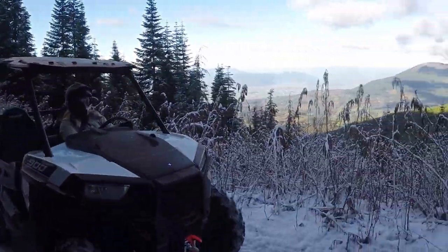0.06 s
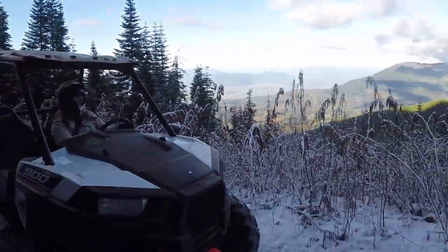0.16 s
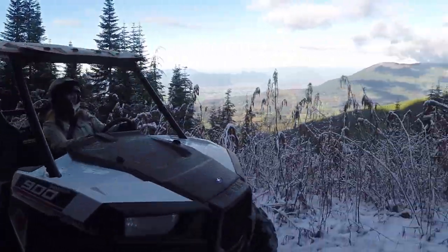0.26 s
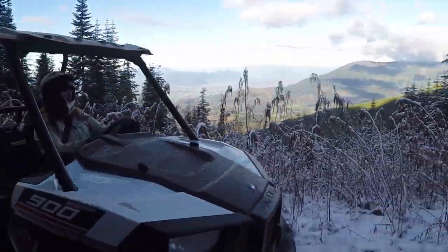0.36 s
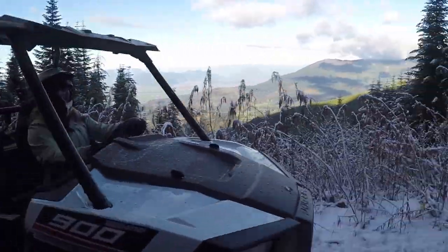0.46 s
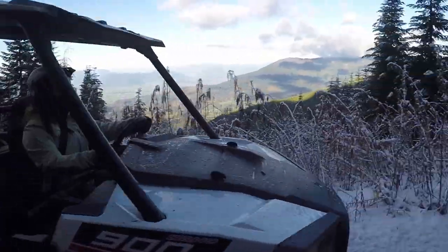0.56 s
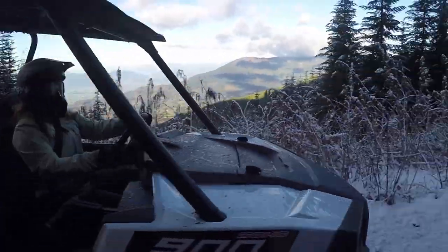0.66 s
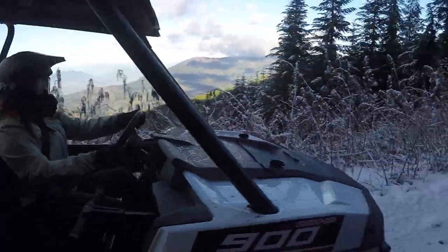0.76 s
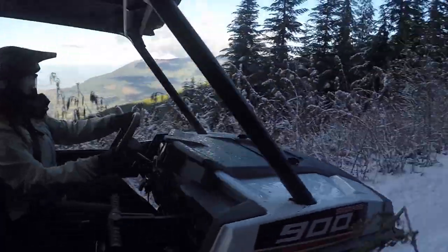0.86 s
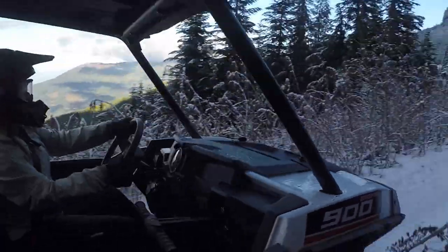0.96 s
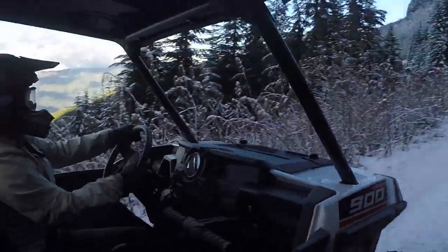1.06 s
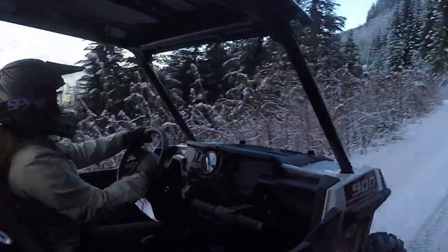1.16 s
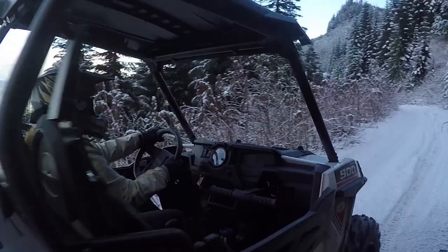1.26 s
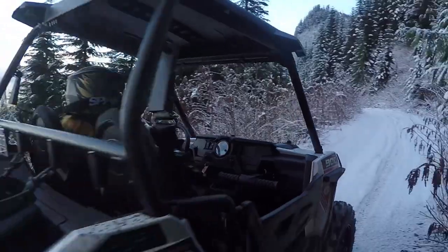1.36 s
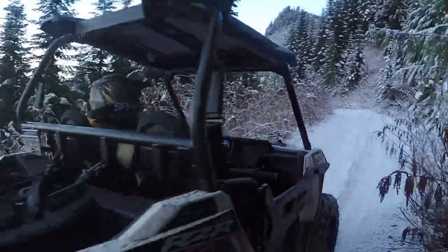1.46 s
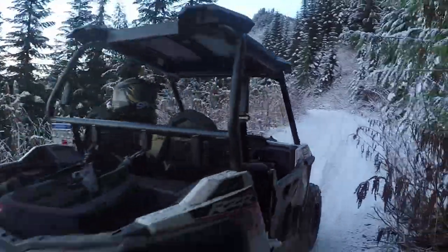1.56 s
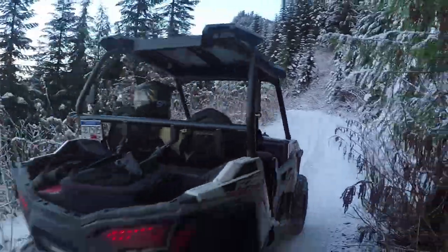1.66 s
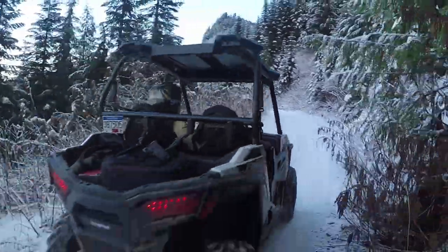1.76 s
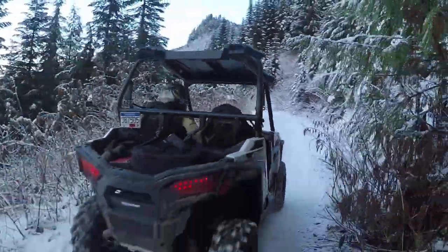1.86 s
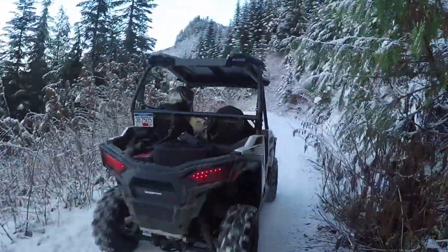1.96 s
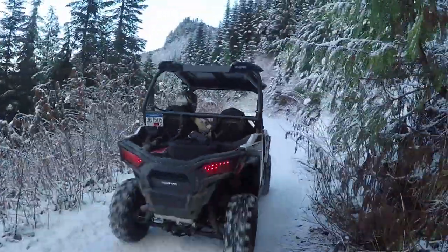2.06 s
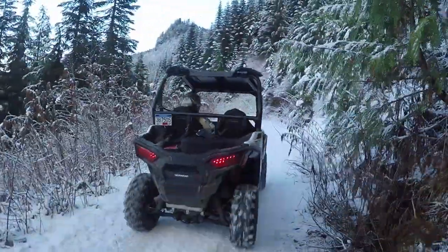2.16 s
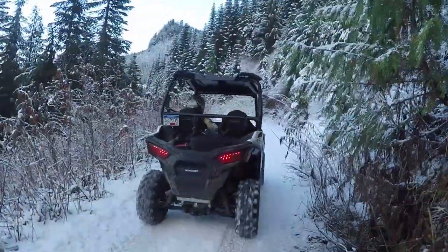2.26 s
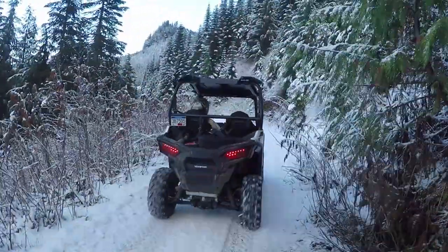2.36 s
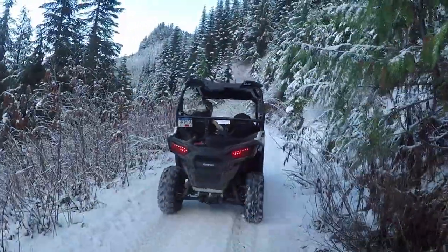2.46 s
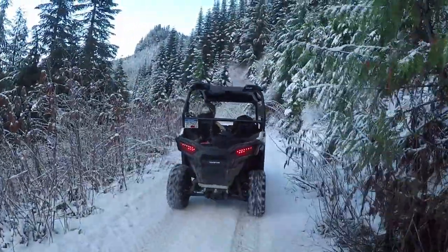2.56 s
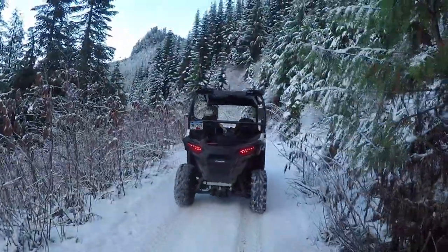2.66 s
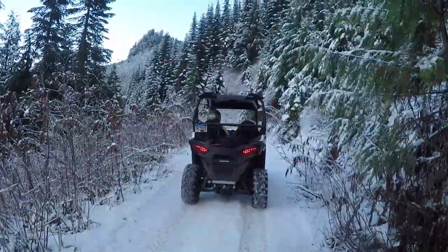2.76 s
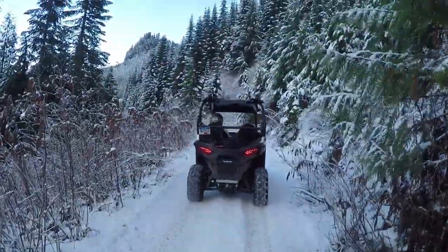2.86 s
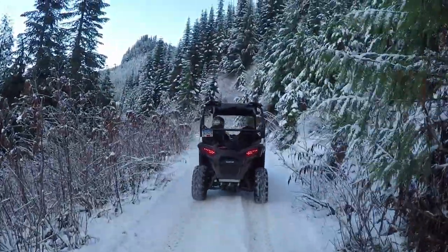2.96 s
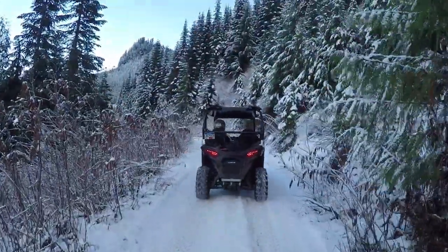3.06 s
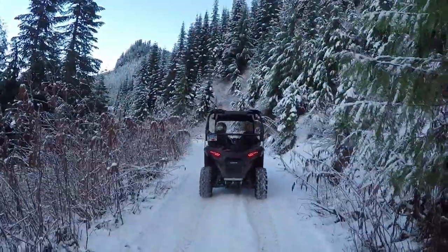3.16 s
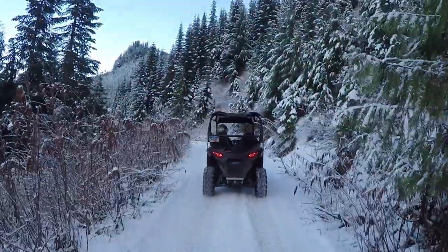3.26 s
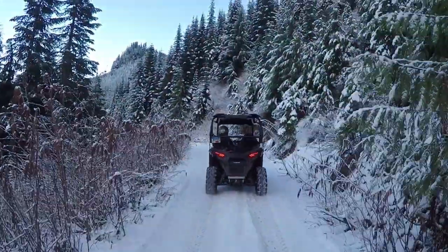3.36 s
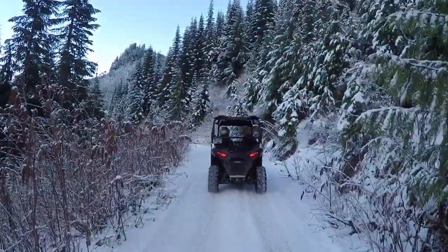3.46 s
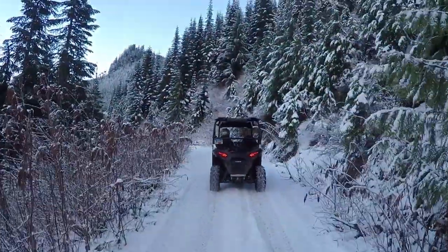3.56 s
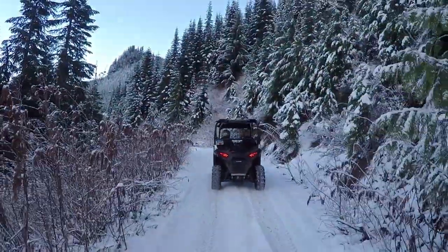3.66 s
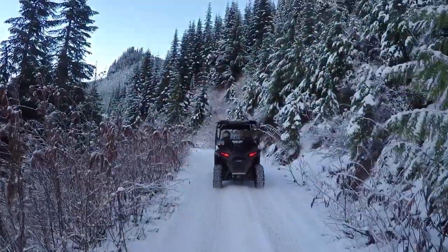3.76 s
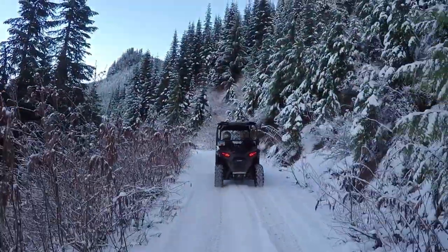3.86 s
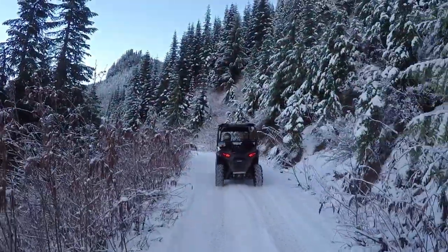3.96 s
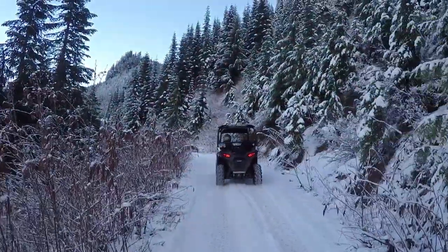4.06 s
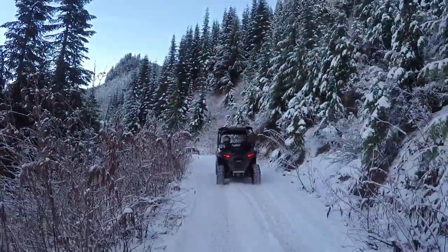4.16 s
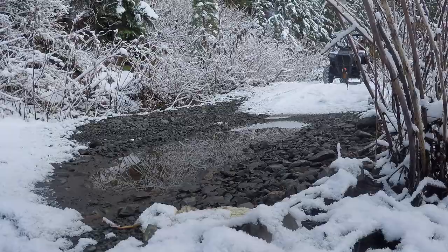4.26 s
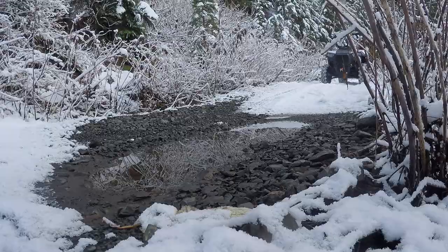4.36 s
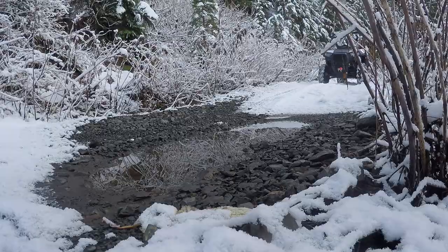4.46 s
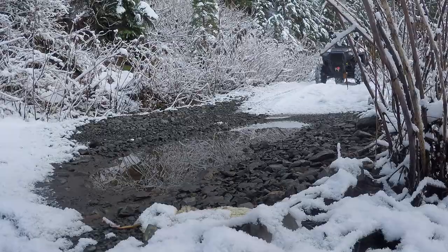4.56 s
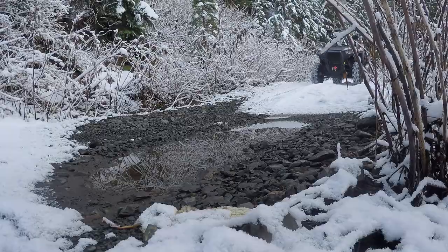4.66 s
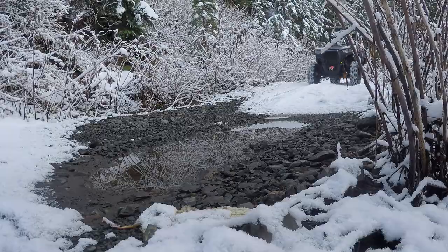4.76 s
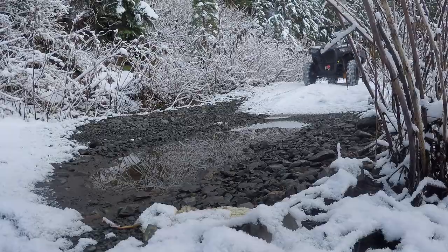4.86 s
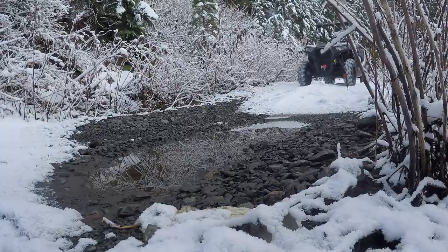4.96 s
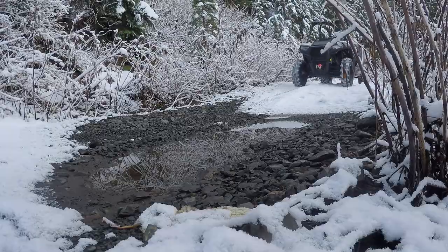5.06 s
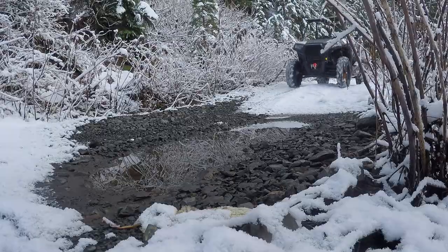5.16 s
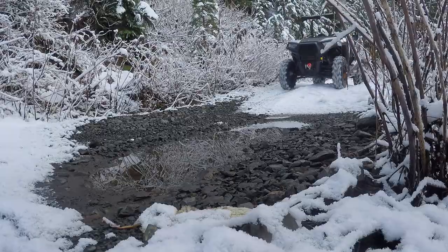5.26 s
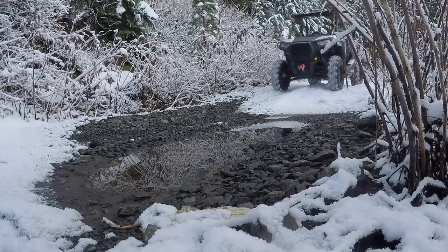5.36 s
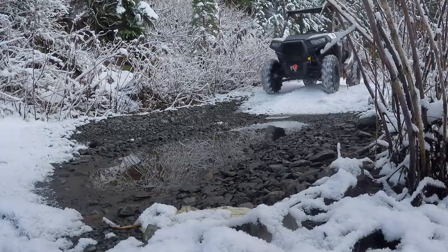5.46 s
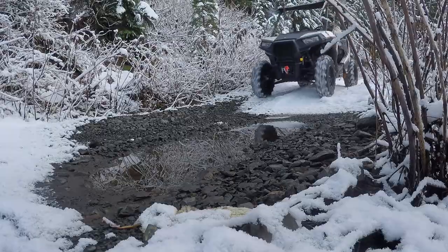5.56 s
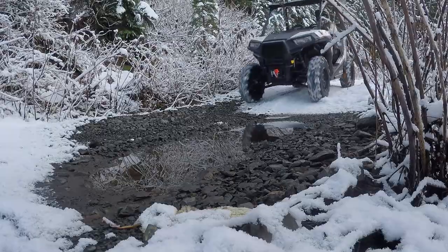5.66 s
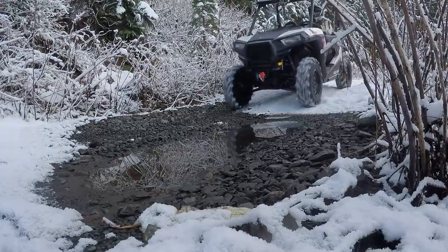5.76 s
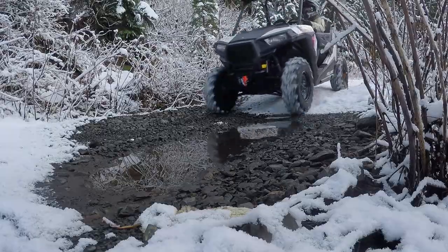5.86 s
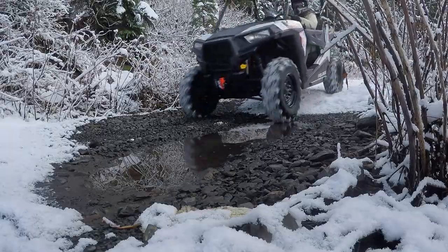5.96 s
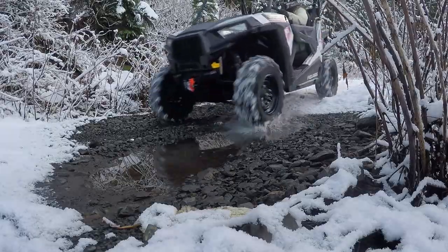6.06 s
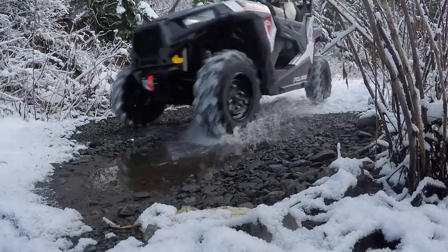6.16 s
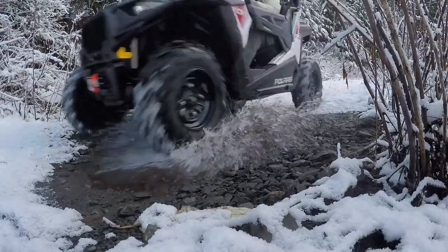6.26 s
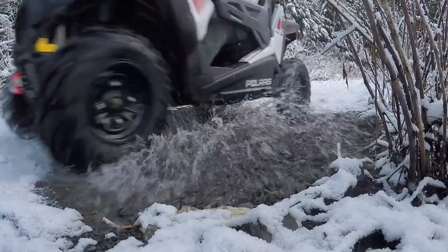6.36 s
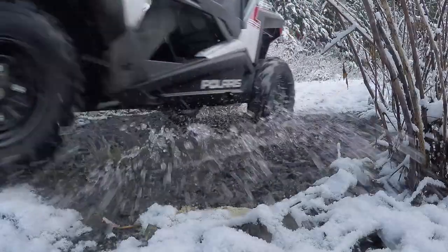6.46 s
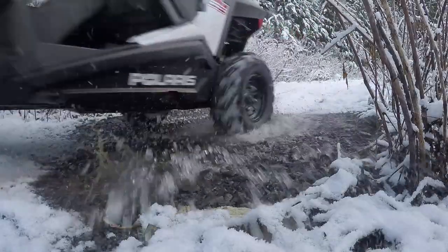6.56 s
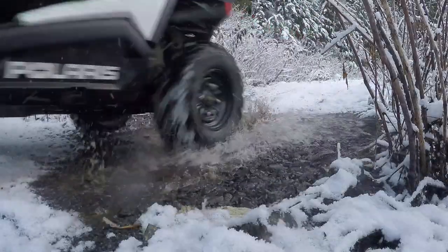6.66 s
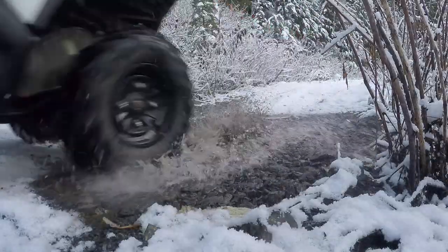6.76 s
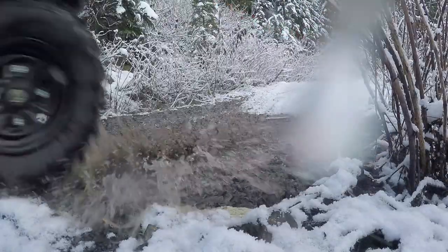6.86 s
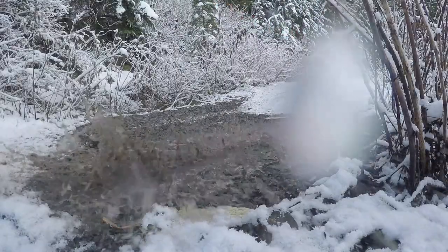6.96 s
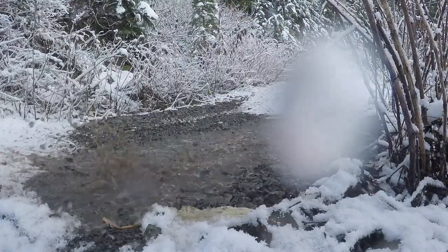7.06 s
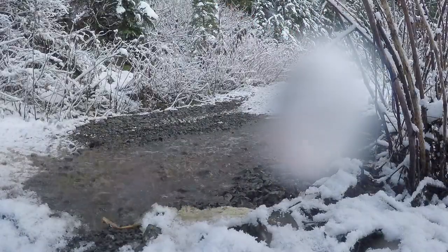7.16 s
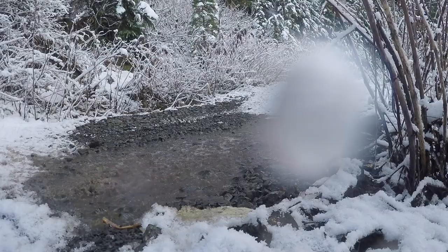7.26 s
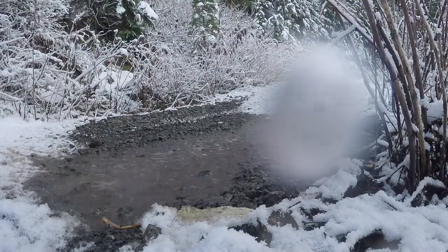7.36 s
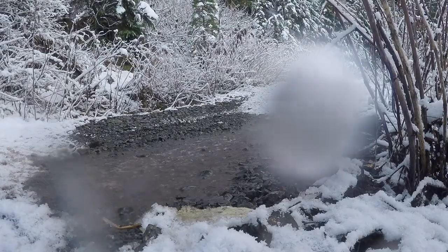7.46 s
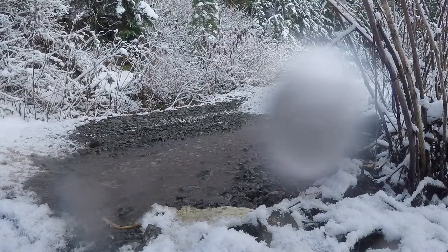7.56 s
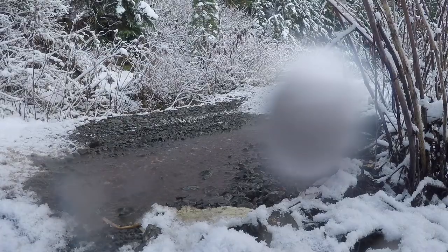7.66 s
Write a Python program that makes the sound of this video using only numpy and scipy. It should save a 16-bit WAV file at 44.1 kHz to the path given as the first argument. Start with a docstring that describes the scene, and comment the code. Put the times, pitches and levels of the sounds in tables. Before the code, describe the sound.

Two joined outdoor passes of an off-road buggy. First, on an open trail, its chugging engine and rattling drive swell near the microphone and fade behind rumbling wind. Then, beside a creek, the engine starts faint, climbs in pitch and loudness, hits the water with hissing spray and low churning; sharp wet splats strike the microphone, bubbles patter, and the engine runs down.

```python
"""A twin-cylinder buggy comes up a snowy trail, passes close to the microphone and drives off in buffeting wind.
The scene fades to a creek: the buggy approaches, revs through the water, spatters the camera and lifts off.
Each exhaust is one engine cycle repeated by the crankshaft; clatter is repeating patterns under a pulsing rasp.
The belt whistles, the wind is filtered noise, and water is random impacts, low noise and rising chirps.
Knocks, buffets and splats are short noise bursts; a thin whine and faint hiss lie underneath."""
import sys
import numpy as np
from scipy import signal
from scipy.fft import rfft, irfft, next_fast_len
from scipy.io import wavfile
from scipy.ndimage import uniform_filter1d, map_coordinates

SR = 44100
rng = np.random.default_rng(int(sys.argv[2]) if len(sys.argv) > 2 else 0)


def bounce(signal):
    """Save signal as a 16-bit WAV file at the path given by the first command-line argument."""
    frames = np.transpose(np.atleast_2d(signal))
    limited = np.clip(frames, -1, 1)
    pcm = np.round(limited * 32767).astype(np.int16)
    wavfile.write(sys.argv[1], SR, pcm)


N = 340011
TIME = np.arange(N) / SR

# engine speed on the trail, four-stroke cycles: start_s [s], cycle_hz [cycles/s]
TRAIL_SPEED = [(0.1, 30.2), (0.52, 30.7), (1.07, 32.7), (1.5, 33.0), (1.84, 32.5), (2.59, 33.7),
               (2.7, 33.4), (3.05, 33.9), (4.3, 33.7)]
# loudness of the exhaust on the trail, holding up while the tailpipe turns to the microphone:
# start_s [s], level_db [dB]
TRAIL_EXHAUST = [(0.0, -44), (0.8, -38), (1.6, -39), (2.6, -38.5), (3.8, -44)]
# side that faces the microphone: start_s [s], aspect [0 nose, 1 flank, 2 tail]
ASPECT = [(0.45, 0.028), (1.2, 0.87), (1.7, 1.13), (2.55, 1.83)]
# the belt drive's song on the trail, sinking as the buggy goes by: start_s [s], pitch_hz [Hz]
TRAIL_BELT = [(0.699, 1727), (1.8, 1662), (2.5, 1610)]
# engine speed at the creek before the run-down is taken off: start_s [s], cycle_hz [cycles/s]
CREEK_SPEED = [(4.4, 25.9), (5.1, 31.6), (5.57, 33.1), (5.8, 34.6), (6.3, 39.6), (6.46, 38.8), (6.74, 39.1),
               (6.94, 36.2), (7.14, 37.4)]
# loudness of the engine at the creek: start_s [s], exhaust_db [dB], clatter_db [dB]
CREEK_LEVEL = [(4.399, -44, -60), (4.85, -49, -56.5), (5.7, -46, -51), (6.2, -40, -39), (6.5, -36, -37),
               (6.8, -30, -30), (7.14, -26, -34.5), (7.28, -25, -37.5), (7.71, -31.5, -53.5)]
# stage of the crossing: start_s [s], stage [0 approaching, 1 pulling through the water, 2 throttle shut]
CROSSING = [(5.7, 0.23), (6.35, 0.86), (7.16, 1.42), (7.19, 2)]
# the belt drive's song at the creek, rising as the buggy gathers speed: start_s [s], pitch_hz [Hz]
CREEK_BELT = [(4.75, 1668), (5.2, 1756), (5.9, 1797)]
# exhaust note for each aspect and stage: order [multiple of the cycle rate], relative level_db [dB]
NOSE_NOTE = [(1, -2.5), (2, -10), (3, -16.5), (4, -2.5), (5, -10), (6, -11), (7, -20.5), (8, -14), (9, -14),
             (10, -17.5)]
FLANK_NOTE = [(1,-9), (2,-5), (3,-5), (4,-2.5), (5,-5), (6,-11), (7,-28.5), (8,-21.5), (9,-14), (10,-16.5),
              (11,-21.5), (12,-26), (13,-28), (14,-44), (15,-23.5), (16,-13)]
TAIL_NOTE = [(1, -1.5), (2, -8), (3, -18.5), (4, -6.5), (5, -8), (6, -19.5), (7, -45), (8, -28.5), (9, -18),
             (10, -21.5), (11, -42), (12, -35), (13, -41), (14, -44), (15, -35), (16, -37), (17, -41),
             (18, -51), (19, -34.5), (20, -26.5), (21, -20.5), (22, -39.5)]
APPROACH_NOTE = [(1, 3.5), (2, -7), (3, -1), (4, 5.5), (5, -0.5), (6, -8.5), (7, -7.5), (8, -9), (9, -6.5),
                 (10, -12), (11, -38.5)]
PULL_NOTE = [(1, 0), (2, 0), (3, -14), (4, -1.5), (5, -4.5), (6, -9), (7, -34.5), (8, -10.5), (9, -11.5),
             (10, -34.5)]
COAST_NOTE = [(1, -15), (2, -13), (3, 2), (4, -3), (5, -11.5), (6, -32.5), (7, -23), (8, -16), (9, -20),
              (10, -40)]
# clatter of valves, belt and gears for each aspect and stage: pitch_hz [Hz], relative level_db [dB per Hz]
NOSE = [(400, -3), (800, -1), (1100, -6), (1650, -3), (2100, -1), (2600, -6), (3100, 1), (3700, -1),
        (4200, -7), (5200, -8.5), (7200, -15.5), (9500, -23.5), (15000, -29)]
FLANK = [(400, -1), (800, -3), (1100, -2), (1650, -2), (2100, 1.5), (2600, -2.5), (3100, 1.5), (3700, -0.5),
         (4200, -3), (5200, -7), (7200, -14), (9500, -20), (15000, -30)]
TAIL = [(400, -19.5), (800, -3), (1100, -1.5), (1650, -4.5), (2100, -3.5), (2600, 3.5), (3100, -3),
        (3700, 2.5), (4200, -2.5), (5200, -9), (7200, -19.5), (9500, -24.5), (15000, -26.5)]
APPROACH = [(400, 4), (800, -16), (1100, -11.5), (1650, -22), (2100, -13), (2600, -2), (3100, -6),
            (3700, -4), (4200, -15.5), (5200, -18), (7200, -25.5), (9500, -29), (15000, -33)]
PULL = [(400,-6.5), (800,-8.5), (1100,-10.5), (1650,-1.5), (2100,-5), (2600,-1.5), (3100,-0.5), (3700,5.5),
        (4200,-10), (5200,-8.5), (7200,-18), (9500,-21.5), (15000,-29)]
COAST = [(400, -4.5), (800, -13.5), (1100, -19), (1650, -1.5), (2100, -3), (2600, -11), (3100, 2.5),
         (3700, -12), (4200, -19), (5200, -15), (7200, -35), (9500, -23), (15000, -52)]
# water thrown by the tyres: start_s [s], spray_db [dB], low churn_db [dB], falling patter_db [dB]
WATER = [(5.85, -103, -70, -90), (6.05, -44.5, -46, -83), (6.3, -42.5, -36, -52), (6.52, -40, -34, -44),
         (6.66, -41, -26, -32.5), (6.8, -43.5, -30, -52), (7.1, -65, -30, -35.5), (7.3, -52.5, -39, -56),
         (7.7, -56, -47, -61.5)]
# spectra of the spray and the churning: pitch_hz [Hz], relative level_db [dB per Hz]
SPRAY_COLOUR = [(300, -19.5), (900, -35), (1700, -8.5), (3600, 7.5), (5000, -15), (5800, -2.5), (7200, -10),
                (8500, -12), (15000, -18.5)]
CHURN_COLOUR = [(15, 9), (40, 7), (85, 2.5), (180, -12), (350, -21), (700, -38), (1500, -64.5)]
# water that hits the camera: start_s [s], level_db [dB], decay_s [s], treble tick_db [dB re the hit]
SPLATS = [(6.457, -12.5, 0.0014, -1.5), (6.4724, -17.5, 0.0012, -17), (6.481, -16.5, 0.0023, -1.5),
          (6.516, -36, 0.00058, 6), (6.580, -20, 0.0046, -24), (6.5988, -18, 0.0013, -16),
          (6.6278, -20.5, 0.0035, -26), (6.682, -21, 0.0048, -33), (6.962, -20, .0035, -24),
          (6.978, -28.5, 0.0023, -28), (7.02, -33, 0.0018, -4), (7.052, -24, 0.0017, 0.5),
          (7.0875, -23.5, 0.0018, -22), (7.091, -28, 0.0007, 8.5), (7.203, -24, 0.0014, -27),
          (7.223, -24.5, 0.00098, 2.5), (7.239, -37.5, .001, 4), (7.299, -29.5, 0.0022, -18),
          (7.3404, -24, 0.0012, -10.5), (7.493, -27.5, 0.00069, -6)]
# response of the camera housing to a splat and to its tick: pitch_hz [Hz], relative level_db [dB per Hz]
HOUSING = [(150, -30), (500, -6), (900, -6.5), (1350, 2), (1900, -2.5), (2400, 0.5), (3100, -6.5),
           (4200, -6), (5000, -8.5), (5900, -45), (9000, -38)]
TICK = [(2500, -21), (4400, 6), (5800, -8), (7300, 2), (9000, -9.5), (12000, -6), (16000, -15)]
# knocks of the chassis: start_s [s], level_db [dB], pitch_hz [Hz], decay_s [s]
KNOCKS = [(0.9154, -21, 1080, 0.0029), (0.9333, -30, 1520, 0.0041), (1.711, -33.5, 1400, 0.011),
          (1.8338, -33.5, 1300, 0.0027), (2.607, -37.5, 1360, 0.0035), (2.8445, -46, 3352, 0.0038)]
# dull buffets on the camera: start_s [s], level_db [dB], decay_s [s]
BUFFETS = [(0.905, -29, 0.042), (1.669, -31.5, 0.017), (1.725, -26.5, 0.027), (2.47, -32, 0.03),
           (3.529, -35, 0.033), (6.597, -26.5, 0.015), (6.693, -13.5, 0.0065)]
# peaks and hollows the camera's case gives to the clatter and the spray: pitch_hz [Hz], width_hz [Hz],
# height_db [dB]
CASE = [(1370,170,-2.5),(1680,440,6),(2670,430,1),(3002,215,-4.5),(3290,270,2),(4580,820,2.5),(5860,500,-6.5),(6400,350,-2.5),(7060,1230,5.5),(8570,400,-3),(10830,660,3),(12200,1000,-2.5)]
# slow rise and fall of wind on the microphone: start_s [s], level_db [dB]
WIND_LEVEL = [(0.0, -34), (1.0, -32), (2.8, -32), (4.3, -28.5)]
# spectrum of the wind: pitch_hz [Hz], relative level_db [dB per Hz]
WIND_COLOUR = [(8, -5), (16, -1), (36, -3.5), (55, -16), (80, -21), (130, -37.5), (300, -42), (700, -83)]

# the pass: moment of closest approach, gap to the microphone, ground speed
PASS_S, PASS_GAP_M, PASS_M_PER_S = 1.41, 1.234, 3.34
# clatter at the closest point, and its gain for each step of aspect from nose to tail
CLATTER_DB, REARWARD_DB = -35, 1.75
# the throttle shuts: moment, and cycles per second lost after one second
LIFT_S, RUN_DOWN_HZ = 7.165, 17.2
# fade from trail to creek: start, length, power of the ramp
FADE_S, FADE_LENGTH_S, FADE_POWER = 3.847, 0.97, 3.16
# gusts: rms depth, and roughly how many per second
GUST_DB, GUSTS_PER_S = 1.6, 7.8
CUT_OFF_HZ = 15450  # top of the recorder's band


def trail_pass(belt_db=-10, belt_octave_db=-18):
    """The buggy rolls by at a steady pace; its clatter and belt fall off with distance from the microphone."""
    (cycle_hz,), (pipe_db,) = curves(TRAIL_SPEED), curves(TRAIL_EXHAUST)
    (aspect,), (belt_hz,) = curves(ASPECT), curves(TRAIL_BELT)
    distance_m = np.hypot(PASS_GAP_M, PASS_M_PER_S * (TIME - PASS_S))
    distance_db = 20 * np.log10(PASS_GAP_M / distance_m)
    casing_db = CLATTER_DB + distance_db + REARWARD_DB * (aspect - 1)
    motor = engine(cycle_hz, pipe_db, casing_db, aspect, [NOSE_NOTE, FLANK_NOTE, TAIL_NOTE], [NOSE, FLANK, TAIL],
                   uneven=0.1, jitter=0.0012, smear=0.1377, repeat_hz=2600, throb=0.14, grain_db=0.9)
    # here the belt levels are relative to the clatter
    return motor + belt(belt_hz, casing_db + belt_db, casing_db + belt_octave_db)


def creek_crossing(belt_db=-76, belt_octave_db=-65):
    """The buggy gathers speed, pulls through the water and runs down, fast at first, when the throttle shuts."""
    (cycle_hz,), (pipe_db, casing_db) = curves(CREEK_SPEED), curves(CREEK_LEVEL)
    (stage,), (belt_hz,) = curves(CROSSING), curves(CREEK_BELT)
    cycle_hz = cycle_hz - RUN_DOWN_HZ * np.sqrt(np.maximum(TIME - LIFT_S, 0))
    notes = [APPROACH_NOTE, PULL_NOTE, COAST_NOTE]
    motor = engine(cycle_hz, pipe_db, casing_db, stage, notes, [APPROACH, PULL, COAST],
                   uneven=0.17, jitter=0.0025, smear=0.1217, repeat_hz=620, throb=0.075, grain_db=0.7)
    return motor + belt(belt_hz, belt_db, belt_octave_db)


def engine(cycle_hz, pipe_db, casing_db, stage, notes, casings, uneven, jitter, smear, repeat_hz, throb, grain_db):
    """Exhaust and clatter driven by one crankshaft, with random wander in its timing and in the exhaust strength."""
    turns = np.cumsum(cycle_hz) / SR + jitter * drift(30)  # counted in engine cycles
    steady_pipe = blend(stage, [exhaust(turns, note, smear) for note in notes])
    pipe = steady_pipe * (1 + uneven * drift(70))
    drive = through_case(machinery(turns, repeat_hz, throb, grain_db))
    clatter = blend(stage, [colour(drive, casing) for casing in casings])
    return amp(pipe_db) * pipe + amp(casing_db) * clatter


def exhaust(turns, note, smear, order=9):
    """One cycle's blow ringing down the pipe; the silencer holds back low orders, higher ones are scattered."""
    size = 2 ** 10
    k = np.arange(size // 2 + 1)
    db = np.r_[-20, np.transpose(note)[1]]
    beyond_table = np.clip(k - len(db) + 1, 0, 10)  # steep fall past the last listed order
    log_gain = np.log(amp(np.interp(k, np.arange(len(db)), db))) - beyond_table
    # minimum phase: the pipe rings only after the blow
    mirrored = np.r_[log_gain, log_gain[-2:0:-1]]
    causal = np.exp(np.conj(signal.hilbert(mirrored)))[:len(k)]
    phase = np.where(k <= order, smear * k ** 2, 2 * np.pi * rng.random(len(k)))
    orders = causal * np.exp(1j * phase) * (k > 0)
    firing = np.linalg.norm(orders[3:7])
    cycle = irfft(orders) * size / np.sqrt(2) / firing  # the firing orders have rms 1
    return np.interp(turns % 1, np.arange(size) / size, cycle, period=1)


def machinery(turns, repeat_hz, throb, grain_db, lines_db=4.5, paths_per_s=2.5, repeat_share=0.69, count=3):
    """Clatter: patterns repeat with each cycle and reach the ear by changing paths, under a pulsing rasp."""
    size, repeating = 2 ** 12, np.zeros(N)
    for _ in range(count):
        heights = amp(lines_db * np.clip(rng.standard_normal(size // 8), -2, 2))
        pattern = irfft(heights * np.exp(2j * np.pi * rng.random(size // 8)), size)
        repeating += drift(paths_per_s) * pattern[(turns % 1 * size).astype(int)]
    # the lines shift, the power holds
    power = abs(uniform_filter1d(repeating ** 2, SR // 30))
    repeating /= np.sqrt(power + 1e-12)
    pulsing = 1 + throb * (np.cos(4 * np.pi * turns) + np.cos(2 * np.pi * turns))
    rasp = unit(rng.standard_normal(N) * pulsing * amp(grain_db * drift(350)))
    # the repeating share of the power shrinks above repeat_hz, leaving rasp
    share = repeat_share / (1 + (np.fft.rfftfreq(N, 1 / SR) / repeat_hz) ** 2)
    return irfft(rfft(repeating) * np.sqrt(share) + rfft(rasp) * np.sqrt(1 - share), N)


def belt(hz, db, octave_db, flutter_per_s=130, waver_hz=20):
    """The belt drive's fuzzy whistle and its octave, fluttering in strength and wavering in pitch."""
    angle = 2 * np.pi * np.cumsum(hz + waver_hz * drift(30)) / SR

    def fuzzy(k):
        """Harmonic k with two randomly drifting quadratures."""
        in_phase = drift(k * flutter_per_s) * np.cos(k * angle)
        return unit(in_phase + drift(k * flutter_per_s) * np.sin(k * angle))

    return amp(db) * fuzzy(1) + amp(octave_db) * fuzzy(2)


def water(bubble_db=-5):
    """Tyres churn the creek and fling fine spray; heavier drops patter back and trap bubbles."""
    spray_db, churn_db, patter_db = curves(WATER)
    spray = colour(through_case(droplets(per_s=1700, spread_db=4.0)), SPRAY_COLOUR)
    churn = colour(rng.standard_normal(N), CHURN_COLOUR)
    patter = colour(droplets(per_s=600, spread_db=3.5), HOUSING) + amp(bubble_db) * bubbles()
    return amp(spray_db) * spray + amp(churn_db) * churn + amp(patter_db) * patter


def droplets(per_s, spread_db):
    """A random train of impacts of very unequal size."""
    sizes = amp(spread_db * np.minimum(rng.exponential(1, N), 4))
    return (rng.random(N) < per_s / SR) * rng.choice([-1, 1], N) * sizes


def bubbles(per_s=130, cycles=7, count=24):
    """Air pockets in the churned water: short rising chirps at many pitches."""
    t, out = np.arange(SR // 16) / SR, np.zeros(N)
    for hz in np.geomspace(350, 1600, count):
        chirp = np.sin(2 * np.pi * hz * t * (1 + 4 * t)) * np.exp(-t * hz / cycles)
        for chance in rng.random(rng.poisson(per_s * N / SR / count)):
            add(out, chance * N / SR, chirp)
    return unit(out)


def blows():
    """Everything that strikes close at hand: water on the camera, chassis knocks and dull buffets."""
    out = np.zeros(N)
    add_splats(out)
    add_knocks(out)
    add_buffets(out)
    return out


def add_splats(out, slap_cycles=1.05):
    """Water slaps the camera housing with a treble tick; the shorter a slap, the less bass it has."""
    for s, db, decay_s, tick_db in SPLATS:
        slap, tick = colour(short_noise(), HOUSING), colour(short_noise(), TICK)
        slap = band(slap, min(slap_cycles / decay_s, SR / 10), CUT_OFF_HZ)
        add(out, s, amp(db) * (burst(slap, decay_s) + amp(tick_db) * burst(tick, decay_s / 2)))


def add_knocks(out):
    """Chassis knocks: brief bursts of noise in a band around each pitch."""
    for s, db, hz, decay_s in KNOCKS:
        add(out, s, amp(db) * burst(band(short_noise(), hz / 1.47, hz * 1.33), decay_s))


def add_buffets(out):
    """Wind buffets: brief bursts of low noise."""
    for s, db, decay_s in BUFFETS:
        add(out, s, amp(db) * burst(colour(short_noise(), CHURN_COLOUR), decay_s))


def short_noise():
    """A quarter second of white noise."""
    return rng.standard_normal(SR // 4)


def burst(noise, decay_s, rise=0.45):
    """Shapes noise into a blow: quick rise, exponential fall, rms 1 at its crest."""
    u = np.arange(len(noise)) / SR / decay_s
    shape = (1 - np.exp(-u / rise)) * np.exp(-u)
    return unit(shape * noise) * np.sqrt(np.mean(shape ** 2)) / shape.max()


def through_case(x):
    """Lays the peaks and hollows of the camera's case on a sound."""
    hz = np.fft.rfftfreq(N, 1 / SR)
    db = sum(height * 2 ** (-(2 * (hz - centre) / width) ** 2) for centre, width, height in CASE)
    return irfft(rfft(x) * amp(db), N)


def wind():
    """Lumpy low turbulence at the microphone on the open trail, swelling in random gusts."""
    level_db, = curves(WIND_LEVEL)
    return amp(level_db + GUST_DB * drift(GUSTS_PER_S)) * colour(rng.standard_normal(N), WIND_COLOUR)


def whine(hz=8631, line_db=-75, halo_db=-82):
    """A thin steady whine in a narrow band of hiss."""
    line = np.sqrt(2) * np.sin(2 * np.pi * hz * TIME)
    halo = unit(band(rng.standard_normal(N), 8400, 8720))
    return amp(line_db) * line + amp(halo_db) * halo


def hiss(db=-80):
    """The microphone's own faint hiss: white noise."""
    return amp(db) * rng.standard_normal(N)


def amp(db):
    """Decibels to gain."""
    return 10 ** (np.asarray(db) / 20)


def unit(x):
    """Scales to rms 1."""
    return x / np.sqrt(np.mean(x ** 2) + 1e-20)


def curves(rows):
    """Each column of a table, after its times, as a curve over time."""
    s, *columns = np.transpose(rows)
    return [np.interp(TIME, s, c) for c in columns]


def add(mix, s, sound):
    """Mixes a sound in at time s."""
    part = mix[round(s * SR):][:len(sound)]
    part += sound[:len(part)]


def gains(points, hz):
    """A spectrum table read on a log-frequency axis, falling steeply below its first point."""
    f, db = np.transpose(points)
    return amp(np.interp(np.log(hz + 1), np.log(f + 1), db)) * np.minimum(hz / f[0], 1) ** 2


def colour(x, points):
    """Filters x by a spectrum table; rms 1."""
    size = next_fast_len(len(x))
    spectrum = rfft(x, size) * gains(points, np.fft.rfftfreq(size, 1 / SR))
    return unit(irfft(spectrum, size)[:len(x)])


def band(x, lo_hz, hi_hz):
    """A gentle band-pass."""
    edges = [lo_hz, min(hi_hz, SR / 2 - 1)]
    return signal.sosfilt(signal.butter(2, edges, "band", fs=SR, output="sos"), x)


def drift(per_s, size=8):
    """Smooth chance of rms 1 that changes about per_s times a second."""
    coarse = TIME[::size]  # worked out on every eighth sample
    points = rng.standard_normal(2 ** 12)
    smooth = map_coordinates(points, [coarse * per_s], order=3, mode="wrap")
    return unit(np.interp(TIME, coarse, smooth))


def blend(stage, sounds):
    """Cross-fades through a list of sounds as stage runs 0, 1, 2."""
    return sum(np.clip(1 - abs(stage - k), 0, 1) * sound for k, sound in enumerate(sounds))


def cross_fade():
    """Gains of the trail scene and of the creek scene over time."""
    ramp = np.clip((TIME - FADE_S) / FADE_LENGTH_S, 0, 1)
    return (1 - ramp) ** FADE_POWER, ramp ** FADE_POWER


def scene():
    """The trail fades into the creek, both heard at one microphone."""
    trail, creek = cross_fade()
    on_trail = trail * (trail_pass() + wind())
    at_creek = creek * (creek_crossing() + water())
    background = (trail + creek) * whine() + hiss()
    return (on_trail + at_creek + blows() + background)[None]


def record(dry):
    """The recorder's band limit: a low-pass filter."""
    low_pass = signal.firwin(301, CUT_OFF_HZ, window=("kaiser", 8), fs=SR)
    return signal.oaconvolve(dry, low_pass[None], "same")


dry = scene()
out = record(dry)
bounce(out)
```